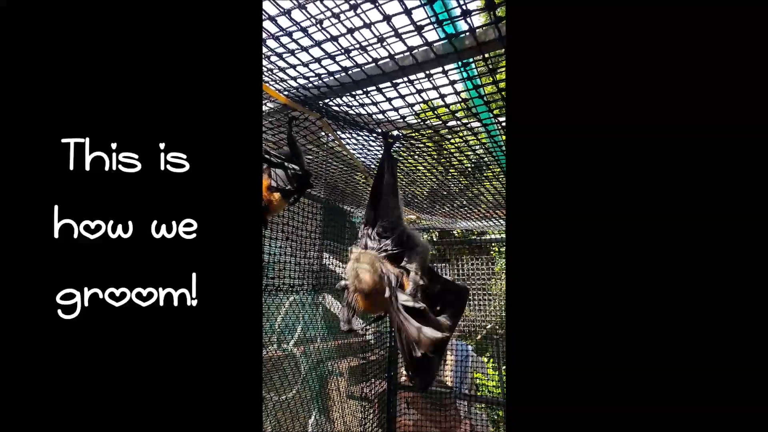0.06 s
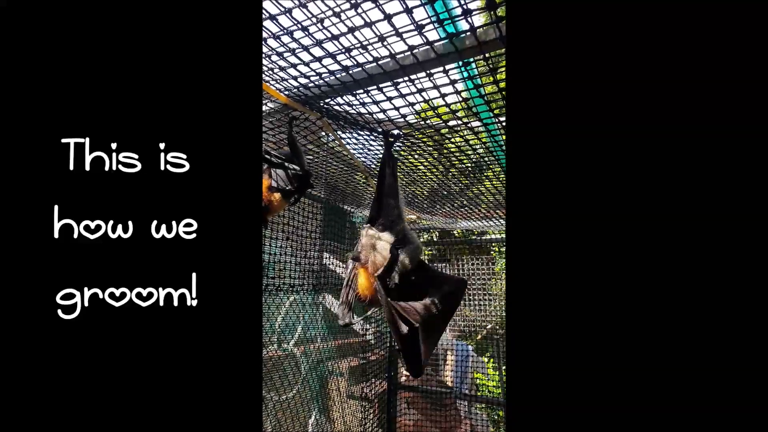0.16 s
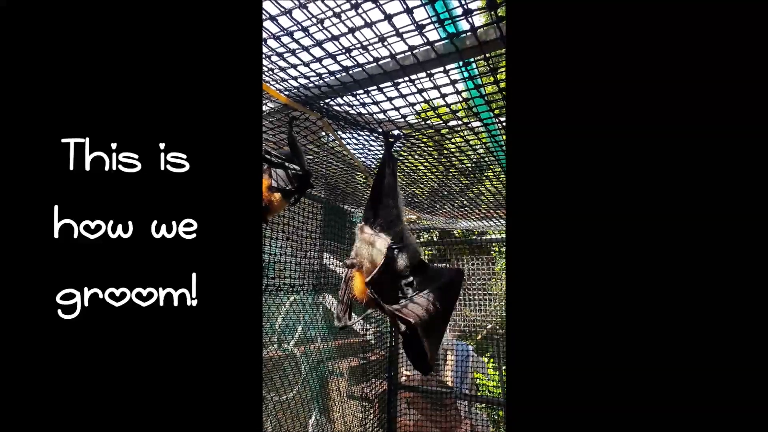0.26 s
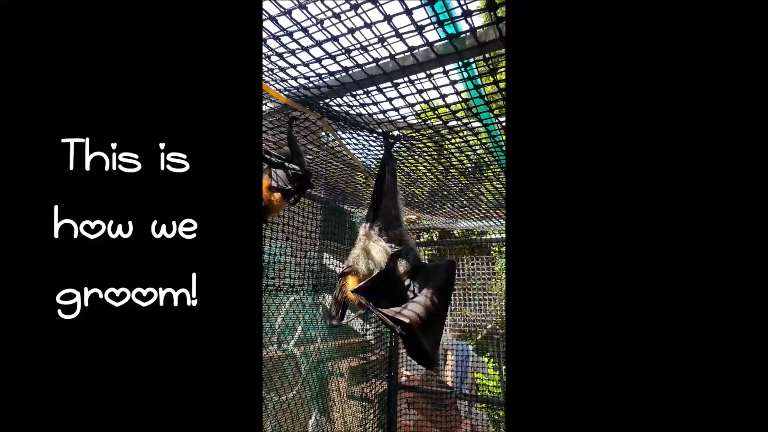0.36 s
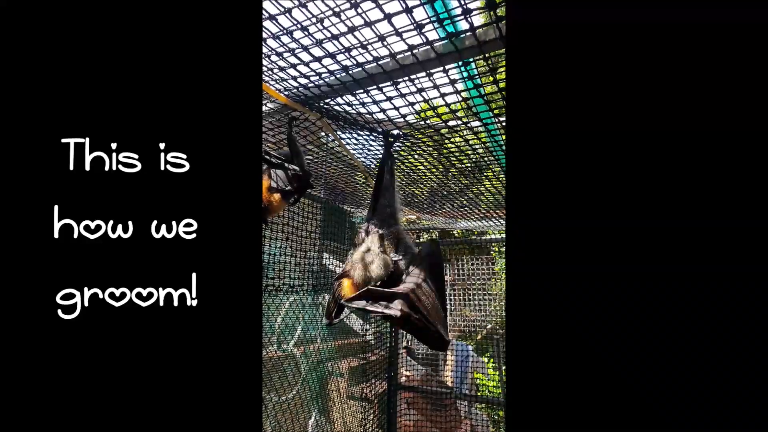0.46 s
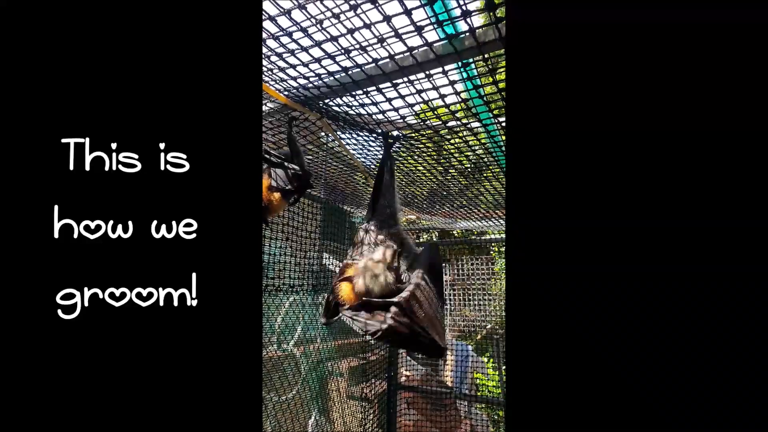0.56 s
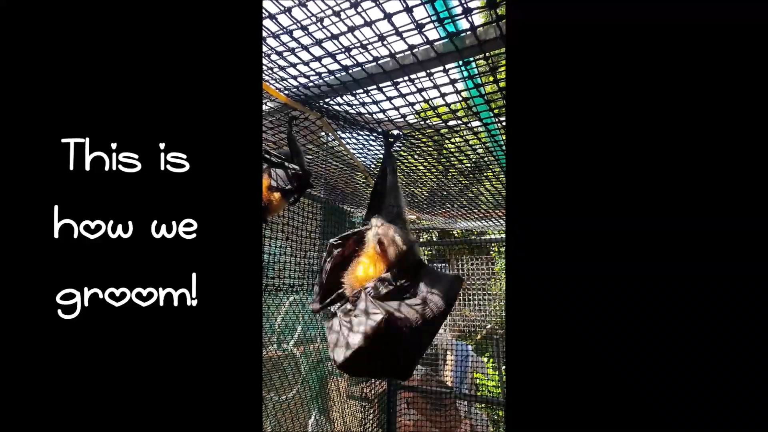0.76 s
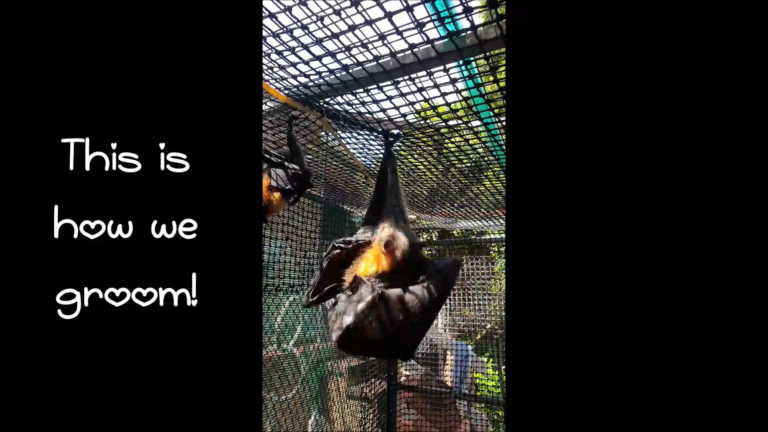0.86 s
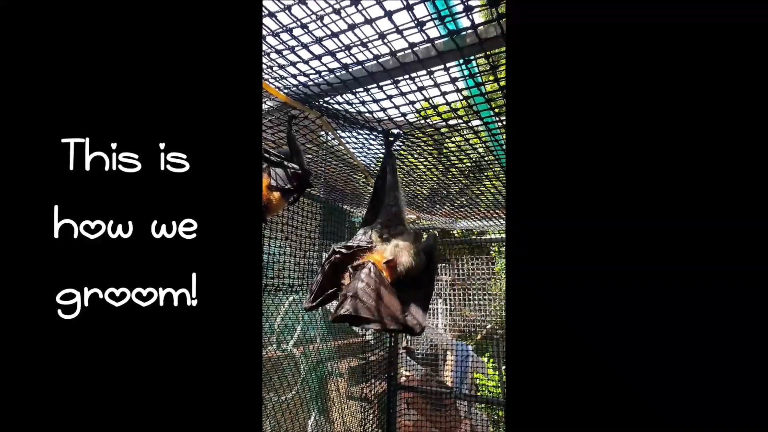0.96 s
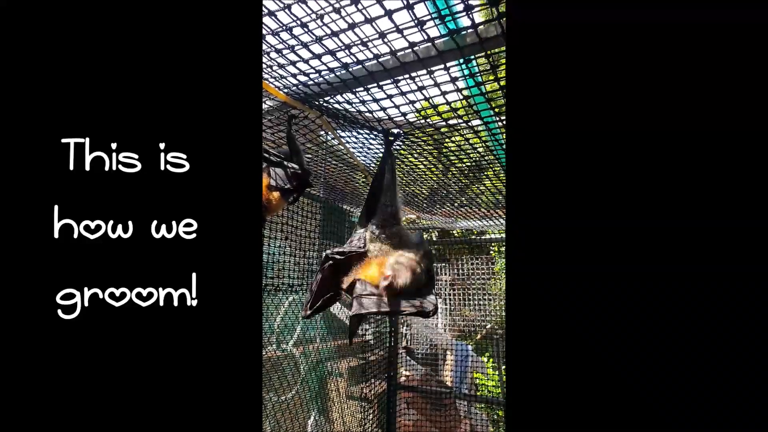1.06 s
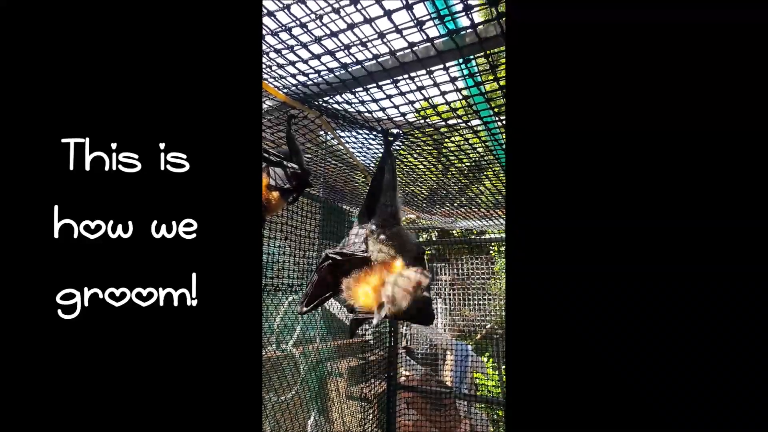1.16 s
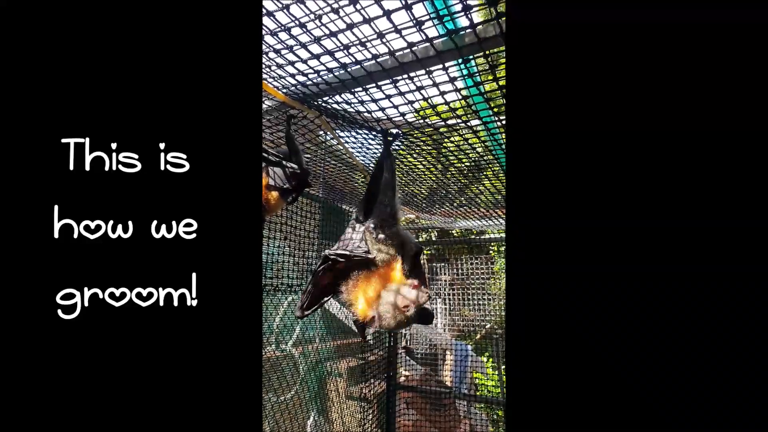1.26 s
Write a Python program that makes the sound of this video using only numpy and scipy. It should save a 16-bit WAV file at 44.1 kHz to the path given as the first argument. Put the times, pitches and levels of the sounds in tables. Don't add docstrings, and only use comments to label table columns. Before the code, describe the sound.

One piercing, raspy bat screech starts almost at once, warbles for a fraction of a second and leaves a short echo; then small claw ticks on wire, faint wing rustle, and a distant engine rising over low traffic.

```python
import sys
import numpy as np
from scipy import signal
from scipy.io import wavfile
from scipy.ndimage import uniform_filter1d

SR = 44100
rng = np.random.default_rng(int(sys.argv[2]) if len(sys.argv) > 2 else 0)


def field_ratio(decibels):
    return 10 ** (np.asarray(decibels, dtype=float) / 20)


def master_out(mix):
    frames = np.transpose(np.atleast_2d(mix))
    ceiling = np.clip(frames, -1, 1)
    pcm = np.round(ceiling * 32767).astype(np.int16)
    wavfile.write(sys.argv[1], SR, pcm)


N = 57330


def level(x, db):
    return x * field_ratio(db) / np.sqrt(np.mean(x ** 2))


def band(x, hz, width_hz, order=2):
    edges = [max(hz - width_hz / 2, hz / 4), min(hz + width_hz / 2, .45 * SR)]
    return signal.sosfilt(signal.butter(order, edges, "bandpass", fs=SR, output="sos"), x)


def walk(rate_hz):
    hold = int(SR / rate_hz)
    steps = np.repeat(rng.standard_normal(N // hold + 1), hold)
    return 1.3 * uniform_filter1d(uniform_filter1d(steps, hold), hold)[:N]


def pan(db):
    return field_ratio(np.array([[.5], [-.5]]) * db)


def split(x):
    low = signal.sosfiltfilt(signal.butter(4, 5500, fs=SR, output="sos"), x)
    return low, x - low


def air(t):
    # band_hz, density_db (dB per Hz)
    spectrum = [(28, -21.5), (55, -1.5), (80, -12.5), (160, -3), (300, -18.5), (600, -59), (2500, -45.5),
                (15800, -39.5)]
    table_hz, table_db = np.array(spectrum).T
    wide_hz, wide_max, rise_db_s = 600, .9, 2
    out = 0
    for hz in 28 * 2 ** (np.arange(28) / 3):
        mid, side = band(rng.standard_normal((2, N)), hz, hz / 4, order=1)
        db = np.interp(np.log(hz), np.log(table_hz), table_db) + 3.1 * walk(11)
        width = min(0.084 + hz / wide_hz, wide_max)
        out = out + field_ratio(db) * (mid + width * side * np.array([[1], [-1]]))
    return level(out, -64.5) * field_ratio(rise_db_s * t)


def thud(t):
    level_db, pitch_hz, t60_s = -43.5, 101.6, 0.1
    return field_ratio(level_db - 60 * t / t60_s) * np.cos(2 * np.pi * pitch_hz * t)


def engine(t):
    # start_s, firing_hz, level_db, second_order_db
    course = [
        (0, 99.6, -71.5, -9.5),
        (0.251, 103.2, -62.5, -14),
        (0.499, 108.7, -58, -14.5),
        (0.631, 110.7, -56.5, -0.5),
        (0.749, 115, -51.5, -13.5),
        (0.848, 115.3, -52, -6.5),
        (1.002, 116, -53.5, -11.5),
        (1.3, 121.8, -53, -27),
    ]
    at, hz, db, second_db = np.array(course).T
    wander, third_db, flutter_db = 0.022, -27, 2
    firing_hz = np.interp(t, at, hz) * (1 + wander * walk(13))
    phase = 2 * np.pi * np.cumsum(firing_hz) / SR
    hum = 0
    for k, order_db in enumerate((0, np.interp(t, at, second_db), third_db)):
        hum = hum + field_ratio(order_db + flutter_db * walk(30)) * np.sin((k + 1) * phase)
    return np.sqrt(2) * hum * field_ratio(np.interp(t, at, db))


def traffic():
    return level(band(rng.standard_normal(N), 65, 45), -56)


def rustles(t):
    # start_s (centre), length_s, level_db, centre_hz, width_hz
    swells = [(.27, 0.045, -64.5, 4900, 440), (.32, 0.021, -63.5, 5300, 140),
              (.12, 0.052, -72.5, 2900, 990), (.13, 0.028, -85.5, 10000, 300), (.2, .05, -72, 3300, 1400),
              (.275, 0.058, -74.5, 1700, 1100), (.79, 0.16, -69, 9600, 7000),
              (1.097, 0.085, -75, 8000, 3600), (1.18, 0.176, -75, 6200, 8000),
              (1.18, 0.053, -79, 2380, 330), (0.95, 0.1, -91.5, 2000, 300)]
    out = 0
    for at, length, db, hz, width in swells:
        mid, side = rng.standard_normal((2, N)) * field_ratio(3 * walk(170))
        grain = mid + .8 * side * np.array([[1], [-1]])
        swell = np.exp(-.5 * (2 * (t - at) / length) ** 2)
        out = out + level(band(grain, hz, width), db) * swell
    return out


def bat_pitch(t):
    # start_s (lowest point), depth_hz
    dips = [
        (0.234, 673),
        (0.275, 539.7),
        (0.328, 381.9),
        (0.379, 675.3),
        (0.436, 617.3),
        (0.506, 843),
    ]
    top_hz, fall_s, climb_s = 4077.5, 0.0077, .013
    wobble, wobble_hz = 0.0083, 403.8
    hz = top_hz * (1 + wobble * walk(wobble_hz))
    for at, depth in dips:
        hz = hz - depth * np.exp(-.5 * ((t - at) / np.where(t < at, fall_s, climb_s)) ** 2)
    return hz


def weaken_bands(voice):
    # from_hz, to_hz, leak_db
    notches = [
        (4300, 6200, -50),
        (12850, 13600, -9),
    ]
    for lo_hz, hi_hz, leak_db in notches:
        stop = signal.cheby1(3, .3, [lo_hz, hi_hz], "bandstop", fs=SR, output="sos")
        kept = signal.sosfiltfilt(stop, voice)
        voice = kept + field_ratio(leak_db) * (voice - kept)
    return voice


def bat(t):
    # start_s, level_db, tilt_db (brightness per harmonic)
    effort = [
        (.232, -65, -5),
        (0.234, -40, -7.5),
        (0.248, -30.5, -3.5),
        (.30, -29, -1),
        (0.351, -34, 1),
        (0.421, -34, -0.5),
        (0.492, -40.5, 2),
        (.51, -36.5, -2.5),
        (.52, -98, -10),
    ]
    harmonics = [2, 0, -2.5, -11.5]
    sidebands = [-37.5, -20, -9.5, -15]
    flutter_hz, flutter_drift, shimmer_db = 798.3, .08, 3
    mouth_hz, mouth_width_hz = 4100, 380
    fourth_opens_s, fourth_rise_s = 0.33, 0.015

    hz = bat_pitch(t)
    at, db, tilt_db = np.array(effort).T
    phase = 2 * np.pi * np.cumsum(hz) / SR
    tilt = np.interp(t, at, tilt_db)
    beat = 2 * np.sin(2 * np.pi * np.cumsum(flutter_hz * (1 + flutter_drift * walk(60))) / SR)
    parts = []
    for k, part_db in enumerate(harmonics):
        tone = np.sqrt(2) * np.sin((k + 1) * phase + k)
        gain = field_ratio(part_db + k * tilt + shimmer_db * walk(250))
        parts.append(gain * tone * (1 + field_ratio(sidebands[k]) * beat))
    parts[0] = parts[0] / np.sqrt(1 + (2 * (hz - mouth_hz) / mouth_width_hz) ** 2)
    parts[3] = parts[3] / (1 + np.exp(-(t - fourth_opens_s) / fourth_rise_s))
    rasp = level(band(rng.standard_normal(N), 10480, 6400, order=8), -11.5) * field_ratio(2 * tilt)
    sounding = (t > at[0]) * (t < at[-1])
    return weaken_bands((sum(parts) + rasp) * field_ratio(np.interp(t, at, db)) * sounding)


def aviary(x, t):
    gap_s, treble_t60_share = 0.0044, 0.85
    echo_s, echo_spread_s, echo_db = .29, .035, -33
    low, high = split(rng.standard_normal((2, 2, N)) * (t > gap_s))
    echoes = 0
    for k, (db, t60_s) in enumerate([(0, 0.33), (-17.5, 0.55)]):
        echoes = echoes + low[k] * field_ratio(db - 60 * t / t60_s)
        echoes = echoes + high[k] * field_ratio(db - 60 * t / (t60_s * treble_t60_share))
    wall = field_ratio(echo_db) * np.exp(-.5 * ((t - echo_s) / echo_spread_s) ** 2)
    echoes = echoes + wall * split(rng.standard_normal((2, N)))[0]
    return signal.fftconvolve(x[None], echoes / np.sqrt(SR / 50), axes=1)[:, :N]


def claws(t):
    # start_s, level_db (peak), ring_hz, pan_db, crack_db
    ticks = [
        (0.6484, -40.5, 1504, 5.5, 0.5),
        (0.8444, -48.5, 740, 8, -38),
        (1.166, -62.5, 1390, 20, -25),
    ]
    t60_s, rise_s = 0.0076, 0.00016
    out = np.zeros((2, N))
    crack = rng.standard_normal(N)
    for at, db, hz, side_db, crack_db in ticks:
        age = np.maximum(t - at, 0)
        ring = np.sin(2 * np.pi * hz * age) * field_ratio(-60 * age / t60_s) * (1 - np.exp(-age / rise_s))
        snap = field_ratio(crack_db - 120 * age / t60_s) * crack
        out += pan(side_db) * field_ratio(db) * (t >= at) * (ring + snap)
    return out


def duck(back, loud):
    depth_db, at_db, low_hz = -14, -58, 2000
    hiss = signal.sosfiltfilt(signal.butter(2, low_hz, "highpass", fs=SR, output="sos"), back)
    return back + hiss * (field_ratio(depth_db * loud / (loud + field_ratio(at_db))) - 1)


def scene():
    # fundamental_db, upper_harmonics_db
    direct = [(1, -8), (-17.5, -12)]
    # start_s, pan_db
    turn = [
        (.24, 3),
        (.30, -3.5),
        (.38, -3.5),
        (.5, -2.5),
        (.65, 0),
    ]
    t = np.arange(N) / SR
    call, ticks = bat(t), claws(t)
    wet = aviary(call + field_ratio(-4.5) * ticks.mean(axis=0), t)
    loud = np.sqrt(uniform_filter1d((wet ** 2).mean(axis=0), int(.04 * SR)) + 1e-12)
    fade = np.minimum((N / SR - t) / 0.028, 1)
    lows = (engine(t) + traffic()) * fade
    far = (duck(air(t), loud) + thud(t) + lows) * pan(2.2)
    near = field_ratio(direct) @ np.array(split(call)) + wet
    return near * pan(np.interp(t, *np.array(turn).T)) + ticks + rustles(t) + far


def top_cut(x):
    return signal.sosfilt(signal.butter(12, 15910, fs=SR, output="sos"), x)


def record(dry):
    mix = signal.sosfilt(signal.ellip(8, .2, 60, 15800, fs=SR, output="sos"), dry)
    return top_cut(mix)


dry = scene()
out = record(dry)
master_out(out)
```